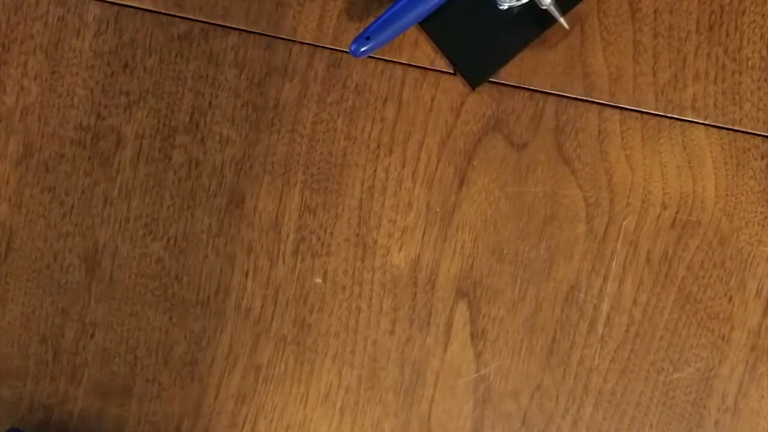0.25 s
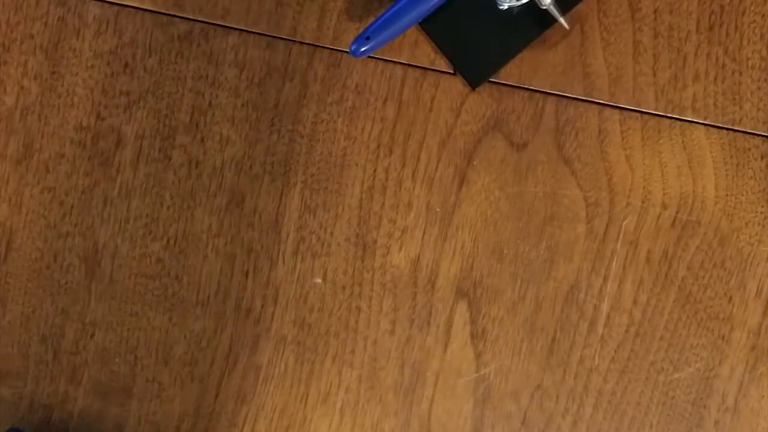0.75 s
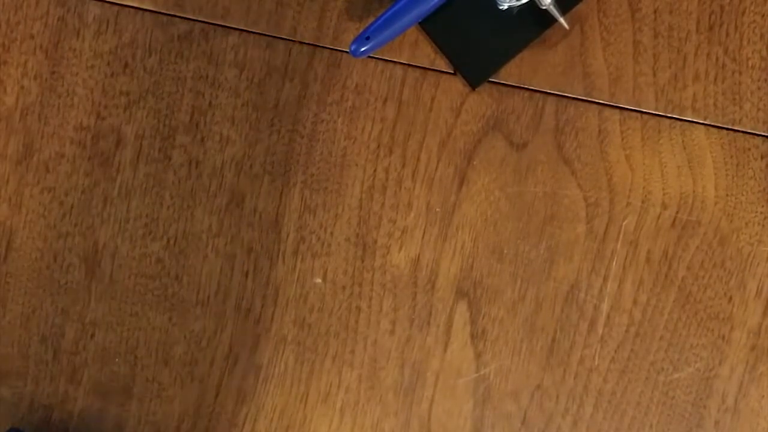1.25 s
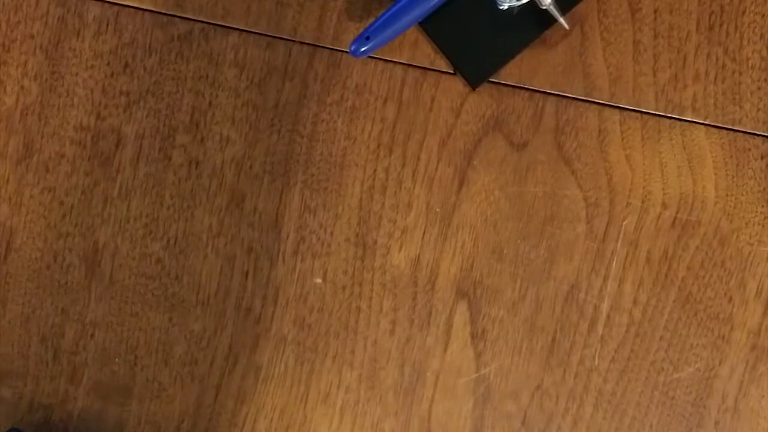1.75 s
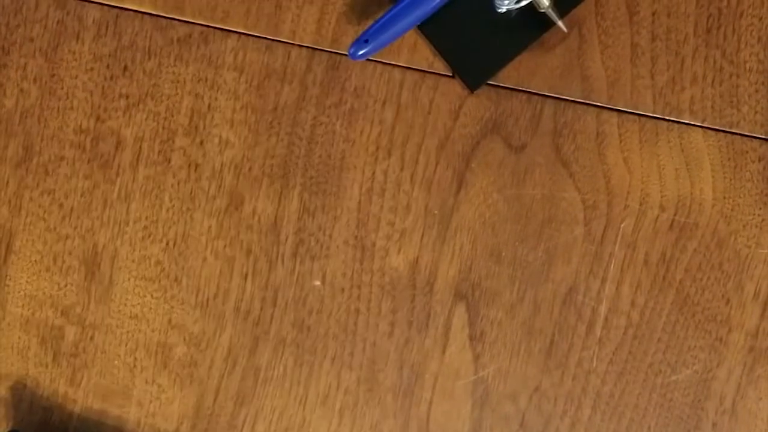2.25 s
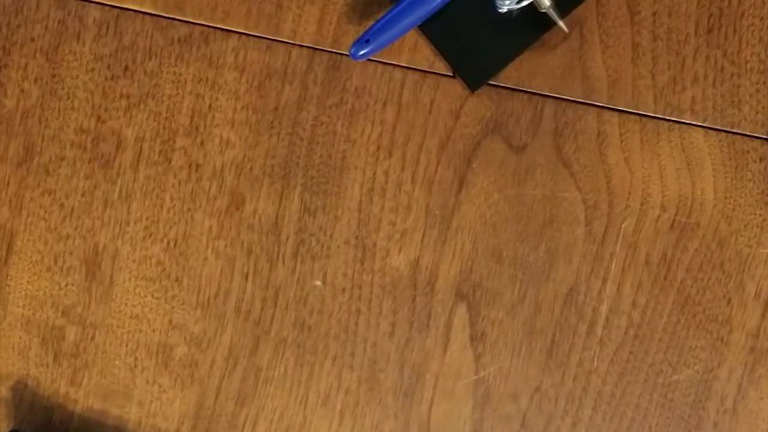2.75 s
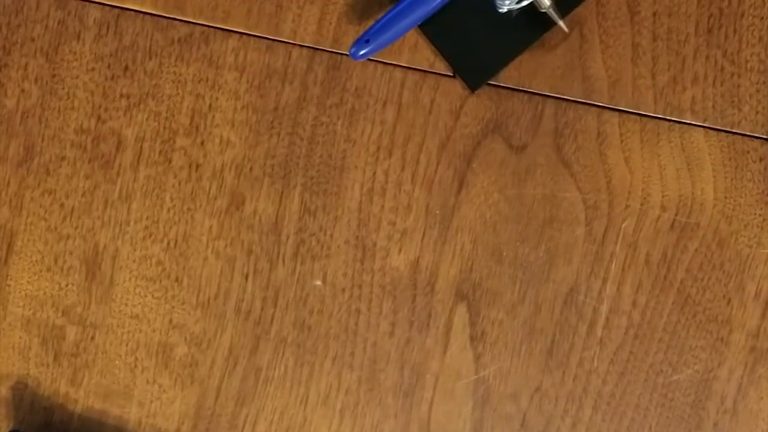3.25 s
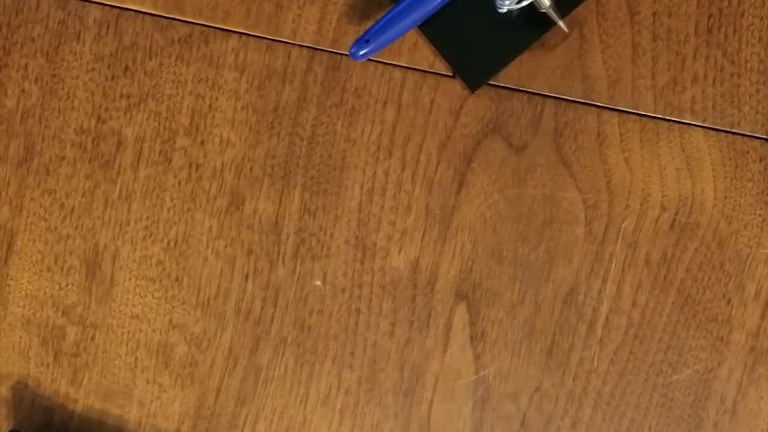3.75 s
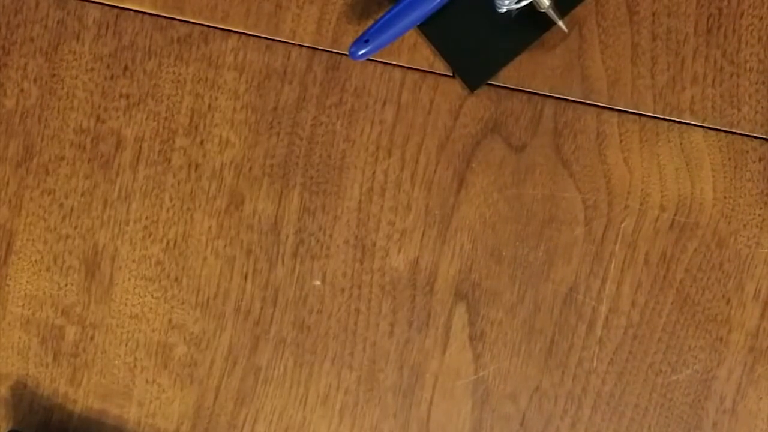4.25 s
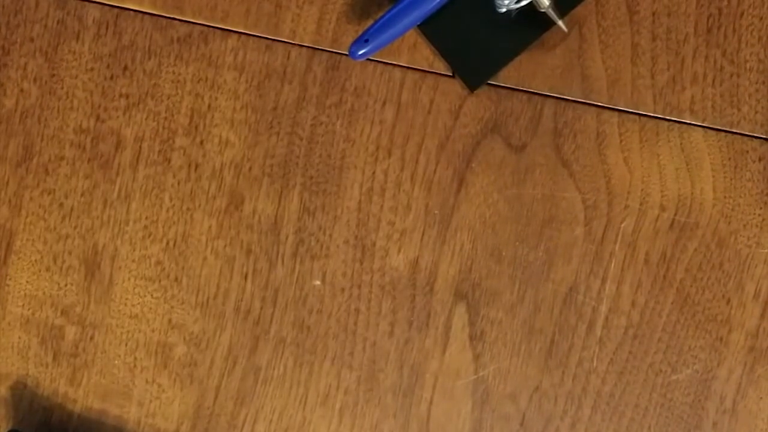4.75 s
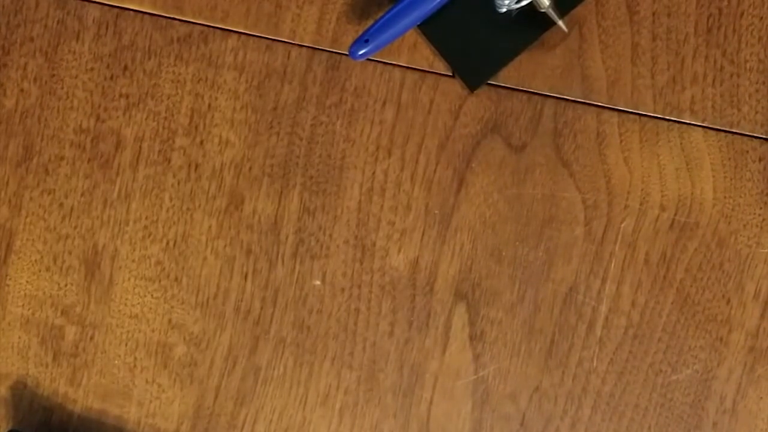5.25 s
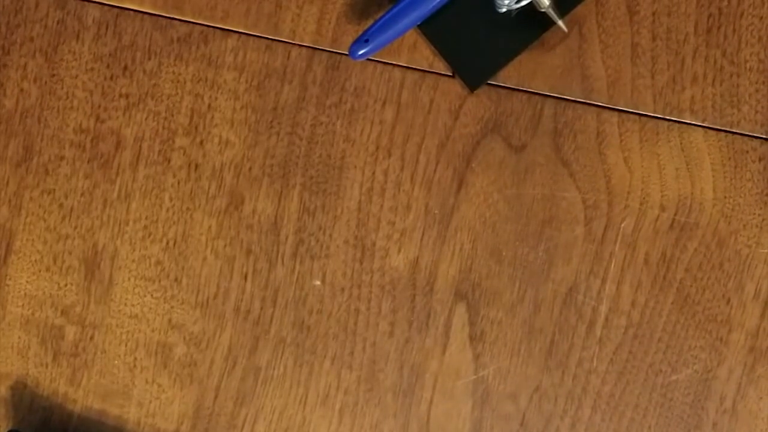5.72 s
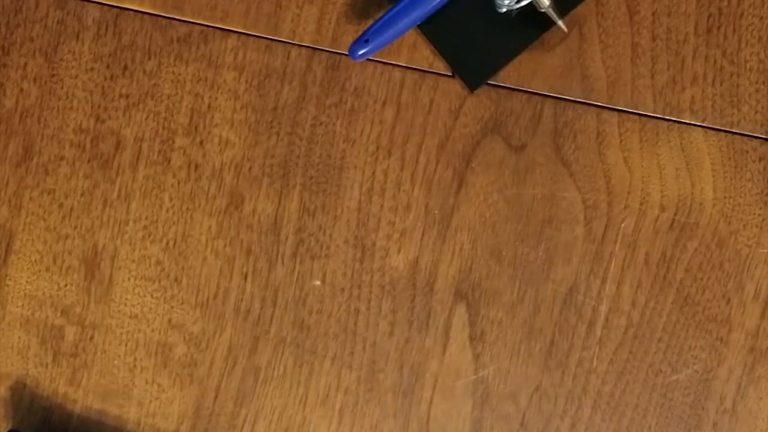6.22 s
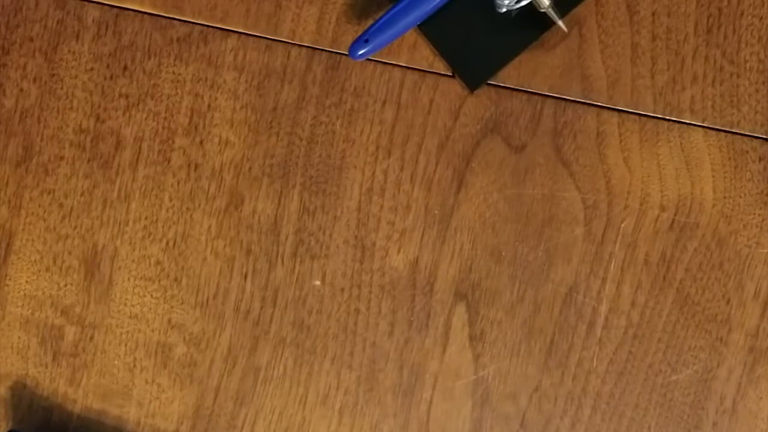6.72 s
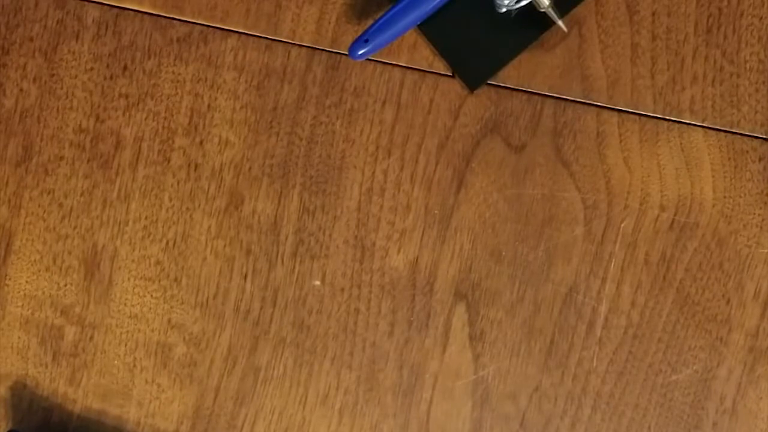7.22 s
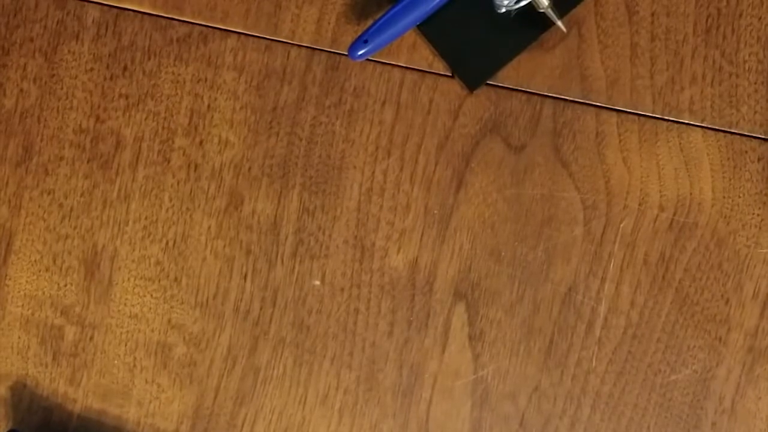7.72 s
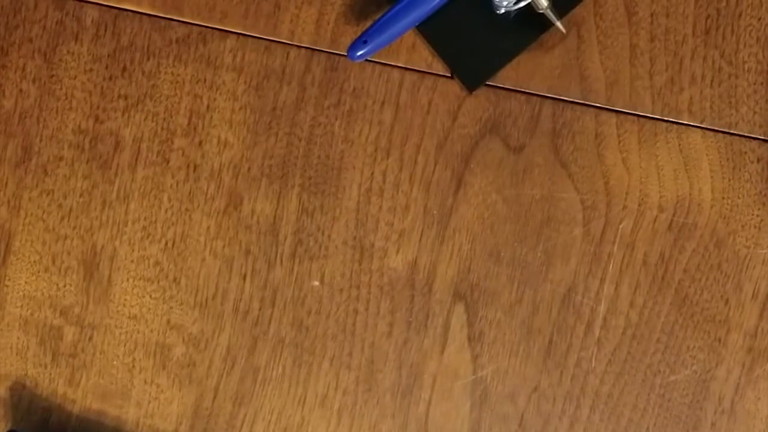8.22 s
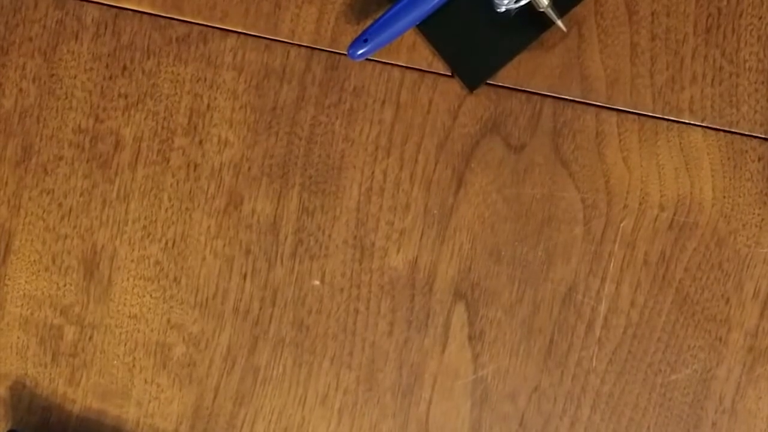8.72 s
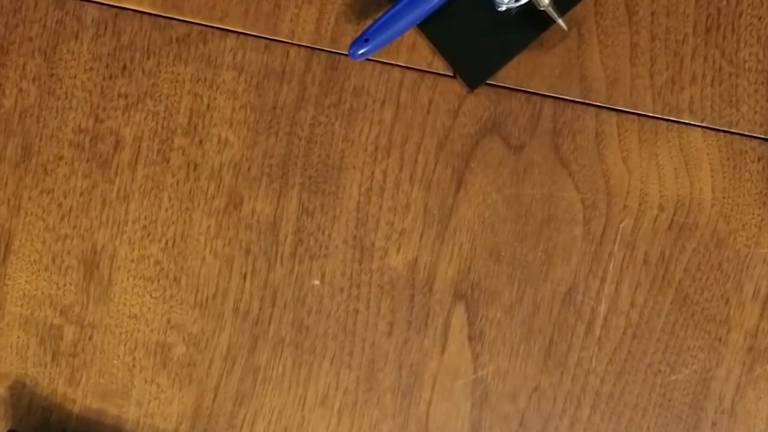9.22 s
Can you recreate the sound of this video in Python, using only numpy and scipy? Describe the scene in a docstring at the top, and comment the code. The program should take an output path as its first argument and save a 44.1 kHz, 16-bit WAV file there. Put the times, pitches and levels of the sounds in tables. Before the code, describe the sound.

Close rhythmic scraping on a hollow-ringing wood table, seven strokes, a pause with light taps, then thirteen more with a few dull bumps.

```python
"""First come dull rubs of a palm and faint brushes over quiet room noise, heard by a phone close by.
Then a hand scrapes something back and forth over a wooden tabletop, about three strokes a second, in two runs.
Catches on the grain are bursts of random force that ring the boards; the edge adds a hiss and digs in.
Between strokes it slides back lightly. Short pushes make bumps and taps; swells of filtered noise make rubs.
Each touch is filtered to two microphone ports, with the echoes of a small room."""
import sys
import numpy as np
from scipy import signal
from scipy.fft import rfft, irfft
from scipy.io import wavfile

SR = 44100
rng = np.random.default_rng(int(sys.argv[2]) if len(sys.argv) > 2 else 0)


def store_pcm(level_fs):
    """Save levels as 16-bit WAV."""
    pcm = np.round(np.clip(level_fs, -1, 1) * 32767).astype(np.int16)
    wavfile.write(sys.argv[1], SR, np.atleast_2d(pcm).T)


N = 417627

# scraping strokes: (middle [s], length [s], relative level [dB],
# how long before the middle the edge digs in [s], relative jolt as the hand brakes [dB])
STROKES = [(1.946, 0.136, -29, .025, -43), (2.257, 0.14, -27.5, 0.039, -36.5),
           (2.566, 0.13, -27.5, 0.018, -32), (2.891, .13, -28, 0.027, -23.5),
           (3.209, 0.15, -26, 0.022, -30.5), (3.522, 0.13, -26.5, 0.019, -21),
           (3.858, 0.12, -30, 0.017, -23), (5.246, 0.2, -35, .056, -42), (5.561, 0.17, -35.5, 0.01, -22),
           (5.866, 0.15, -28.5, .003, -29.5), (6.177, 0.15, -30, 0.052, -29),
           (6.476, 0.14, -25.5, 0.065, -28), (6.785, 0.14, -29.5, 0.035, -28),
           (7.081, 0.15, -28.5, .05, -41), (7.393, 0.17, -29, 0.06, -44), (7.7, 0.17, -30, 0.029, -31.5),
           (8.022, 0.17, -30, 0.021, -30), (8.358, 0.19, -27.5, 0.0063, -23),
           (8.691, .16, -28.5, 0.0085, -40), (9.028, 0.16, -31.5, 0.031, -33)]
# how heavily the edge rests on the wood on the way back: (time [s], relative level [dB])
RETURN_WEIGHT = [(2.1, -55), (2.75, -60), (3.35, -47.5), (3.7, -52), (5.4, -52), (6.0, -46.5), (6.6, -41.5),
                 (7.25, -47), (7.9, -47.5), (8.5, -45), (8.85, -55)]
# stray bumps of the hand on the table: (time [s], relative level [dB])
BUMPS = [(1.902, -41.5), (1.947, -31), (4.632, -28), (7.667, -28.5), (7.973, -23.5), (8.25, -24),
         (8.327, -31), (8.433, -16)]
# light hard taps: (time [s], relative level [dB], contact time [s])
TAPS = [(1.901, -47.5, 0.00055), (4.450, -40, 0.00015), (4.651, -39, 0.00032), (4.985, -37.5, 0.0008),
        (8.24, -33.5, 0.00047)]
# brushes, ticks, squeaks, low thumps and rubs, and the last slide back:
# (start [s], length [s], level [dB], centre [Hz], width of each filter pass [Hz])
SMALL_TOUCHES = [(.4245, 0.0019, -34, 4600, 1970), (.442, 0.0018, -34, 4500, 2600),
                 (.424, 0.062, -44, 1940, 3130), (.435, 0.11, -47, 320, 260),
                 (.69, 0.038, -51.5, 3140, 3330), (.70, 0.061, -49.5, 556, 300),
                 (.96, 0.17, -63, 2130, 3140), (4.63, 0.065, -37.5, 228, 260),
                 (5.188, 0.029, -36.5, 2700, 2270), (6.052, 0.028, -40.5, 1120, 1190),
                 (8.237, 0.031, -37.5, 1100, 1460), (8.407, 0.012, -28.5, 2680, 550),
                 (8.37, 0.21, -29, 210, 190), (9.28, 0.37, -52, 780, 1880)]
# dull rubs of the palm: (start [s], length [s], level [dB])
PALM_RUBS = [(0.0, 0.13, -47.5), (0.153, 0.17, -48), (.27, 0.3, -47), (.85, .33, -45.5), (1.697, 0.19, -46),
             (4.891, 0.34, -54.5), (5.187, 0.1, -34)]
# the table rocks on its legs: (start [s], level [dB])
ROCKS = [(0.698, -43), (.95, -30.5), (1.715, -39.5), (2.622, -39), (7.76, -41), (8.369, -39)]
# resonances of the tabletop: (frequency [Hz], relative level [dB])
TABLE_MODES = [(46, -16), (79, 0.5), (136, 2), (200, -8), (237, -3.5), (288, -2), (328, -1), (392, 0),
               (531, -1), (603, -2), (650, -6), (761, -2.5), (867, -2), (965, -11), (1007, -0.5),
               (1050, -2), (1119, -7.5), (1217, -8.5), (1280, -4.5), (1353, -9.5), (1895, -5.5),
               (1968, -15), (2081, -17.5)]
# what a tap rings with: (frequency [Hz], relative level [dB], width [Hz])
TAP_MODES = [(296, -2.5, 8.5), (632, 4, 47), (650, -10, 53), (1380, -12, 140), (1590, 0, 73),
             (2000, -7, 270), (2740, -7.5, 320), (3500, -10.5, 350)]
# dense wood resonances, as a spectrum: (frequency [Hz], relative level [dB per Hz])
GRAIN = [(40, -0.5), (80, 4), (200, -7), (450, 0), (1100, -0.5), (1550, -4), (2100, -1.5), (3400, -10),
         (5000, -18.5), (8000, -28.5), (16000, -24)]
# hiss of the edge, as a spectrum: (frequency [Hz], relative level [dB per Hz])
EDGE = [(1500, -15), (3500, 13), (5000, 2), (6800, 3.5), (8300, -18.5), (10000, 0), (12000, 1.5),
        (14000, 2), (16000, -8)]
# tone of the light slide back, against a body's own tone: (frequency [Hz], gain [dB])
LIGHT_TOUCH = [(60, 7), (250, -3), (550, 1.5), (1100, 1), (2500, -5), (5000, -6.5), (12000, -7)]
# low shaking of the table in a bump: (frequency [Hz], relative level [dB per Hz])
JUDDER = [(30, -8.5), (80, 0.5), (100, -1), (140, 5), (200, -10), (300, -11.5), (600, -23.5), (2000, -64.5)]
# room noise and microphone hiss: (frequency [Hz], relative level [dB per Hz])
QUIET = [(25, -7.5), (60, 6.5), (130, -7.5), (250, -10), (600, -18), (1000, -23), (2000, -22.5),
         (4000, -32.5), (5200, -26.5), (6500, -40.5), (9000, -44.5), (12500, -26), (16000, -29.5)]
# the room's answer against the direct sound: (frequency [Hz], level [dB])
ROOM = [(60, -15.5), (200, -11.5), (500, -1.5), (1200, -1), (4000, 7), (12000, 1)]
# left level minus right level: (frequency [Hz], difference [dB])
BALANCE = [(60, 4.1), (250, 2.8), (600, 4.4), (760, 1.8), (1100, 5.8), (2200, 5.4), (3500, 5.1),
           (7000, 1.3), (14000, 0.75)]

CUT_IN_S = 1.943  # the scraping cuts in here, with the first stroke already under way
USUAL_STROKE_S = 0.14  # every stroke covers the same distance, so a shorter one is faster
PRESSURE_RISE_DB = 2.5  # the hand leans in over each stroke
SKIM_DB = -1  # until it digs in, the edge only skims the wood
EDGE_DB = -43  # hiss of the edge in a usual stroke, before mixing
BRAKE_SHARE = 0.2193  # the hand brakes this share of a stroke after its middle
# rest before and after the slide back, and gaps this long are pauses without a slide
REST_AFTER_S, REST_BEFORE_S, PAUSE_S = 0.02, 0.0027, 0.6
PUSH_S, JUDDER_S = 0.0042, 0.03  # length of a bump's push, and time scale of the judder's fading
PALM_HZ, ROCK_HZ, ROCK_S = 139, 46.3, 0.17
ROOM_T60_S, ROOM_TREBLE_T60_S = 0.3, 0.23  # time for the echoes to fall by 60 dB
PORT_LAG_S = 0.000259  # lag of the left port in the treble; it shrinks toward the bass
QUIET_DB = -59  # level of the noise shared by both sides
TOP_HZ = 15850

TIME = np.arange(N) / SR
SIZE = 2 ** 14  # length of every filter in samples
FREQ = np.maximum(np.arange(SIZE // 2 + 1) * SR / SIZE, 1)


def scraping(table, modes_db=-4, grain_db=-4, hiss_db=-4, slide_db=-1):
    """Strokes and slides ring the main modes and the dense wood resonances; the edge itself hisses."""
    effort, hiss = stroke_effort() * grip()
    light = return_effort()
    parts = []
    for body in (undb(modes_db) * table, undb(grain_db) * colour(GRAIN)):
        drag_force = friction(catch_rate=1500, spread_db=4.0, smooth_db=-5.0) * effort
        slide_force = friction(catch_rate=600, spread_db=4.5, smooth_db=-6.5) * light
        edge_force = friction(catch_rate=2000, spread_db=0.5, smooth_db=-7) * hiss
        drag = through(drag_force, body)
        slide = through(slide_force, unit(body) * slope(LIGHT_TOUCH))
        edge = through(edge_force, colour(EDGE))
        parts.append(drag + undb(slide_db) * slide + undb(hiss_db) * edge)
    return parts


def stroke_effort(speed_power=1.315, hiss_power=1.84, pace_power=1.0):
    """Drag on the wood follows speed and pressure; hiss follows speed alone and is louder in a quick stroke."""
    wood, hiss = np.zeros(N), np.zeros(N)
    for middle, length, db, lead_s, _ in STROKES:
        span, way, speed = swing(middle, length)
        contact = undb(SKIM_DB * (way * length < -lead_s))
        pressure = undb(db + PRESSURE_RISE_DB * way)
        pace = (USUAL_STROKE_S / length) ** pace_power
        wood[span] += contact * pressure * speed ** speed_power
        hiss[span] += contact * undb(EDGE_DB) * speed ** hiss_power * pace
    return np.array([wood, hiss])


def swing(middle, length):
    """One stroke's samples, its progress from -0.5 to 0.5, and its speed, rising and falling as half a sine."""
    span, age = during(middle - length / 2, length)
    speed = np.abs(np.sin(np.pi * age / length)) * (TIME[span] > CUT_IN_S)
    return span, age / length - .5, speed


def friction(catch_rate, spread_db, smooth_db):
    """Drag force: tiny catches of uneven size on the wood grain (catch_rate per second), over a smooth rub."""
    happens = rng.random(N) < catch_rate / SR
    direction = rng.choice([-1, 1], N)
    size = undb(spread_db * np.minimum(rng.exponential(size=N), 4))
    catches = happens * direction * size
    return unit(unit(catches) + undb(smooth_db) * noise())


def grip(patch_rate=70, uneven_db=2.0):
    """The grain is uneven: the edge grips more or less from patch to patch (patch_rate per second)."""
    patches = rng.standard_normal(N // 100)
    return unit(undb(uneven_db * np.interp(TIME * patch_rate, np.arange(len(patches)), patches)))


def biting(table, bite_db=1.5, bite_s=0.042, speed_power=0.98, pace_power=1.8, centre_hz=950, width_hz=650):
    """The edge digs in and chatters, driving the boards' middle range; the faster it moves, the harder."""
    force = np.zeros(N)
    for middle, length, db, lead_s, _ in STROKES:
        span, way, speed = swing(middle, length)
        age = way * length + lead_s
        fading = (age > 0) * np.exp(-(age / bite_s) ** 2)
        pace = (USUAL_STROKE_S / length) ** pace_power
        force[span] += undb(db) * fading * speed ** speed_power * pace
    # the dense resonances answer at once, the main modes build up a little later
    bodies = (unit(body * resonance(centre_hz, width_hz)) for body in (table, colour(GRAIN)))
    return undb(bite_db) * sum(through(force * noise(), body) for body in bodies) / np.sqrt(2)


def return_effort(swell_power=0.23):
    """A light, uneven slide back fills the gap between one stroke and the next."""
    light = np.zeros(N)
    for (middle, length, *_), (next_middle, next_length, *_) in zip(STROKES, STROKES[1:]):
        start = middle + length / 2 + REST_AFTER_S
        gap = next_middle - next_length / 2 - REST_BEFORE_S - start
        if gap < PAUSE_S:
            span, age = during(start, gap)
            light[span] = np.abs(np.sin(np.pi * age / gap)) ** swell_power
    weight = undb(np.interp(TIME, *np.transpose(RETURN_WEIGHT)))
    return light * grip(patch_rate=22, uneven_db=3.0) * weight


def bumps(table, push_db=30, judder_db=-4):
    """Braking strokes and stray bumps: a soft push swings the low modes, and the hand judders on briefly."""
    brakes = [(middle + BRAKE_SHARE * length, db) for middle, length, _, _, db in STROKES]
    jolts = brakes + list(BUMPS)
    shake = np.zeros(N)
    for start, db in jolts:
        span, age = during(start, 8 * JUDDER_S)
        shake[span] += undb(db) * 2 * np.sqrt(age / JUDDER_S) * np.exp(-age / JUDDER_S)
    force = pushes([(start, db, PUSH_S) for start, db in jolts])
    thud = through(force, unit(table * slope(JUDDER)))
    judder = through(shake * noise(), colour(JUDDER))
    return undb(push_db) * thud + undb(judder_db) * judder


def handling(width_share=0.81):
    """The palm shuffles and the table rocks: broad, dull rubs."""
    palm = [(start, length, db, PALM_HZ, width_share * PALM_HZ) for start, length, db in PALM_RUBS]
    rocks = [(start, ROCK_S, db, ROCK_HZ, width_share * ROCK_HZ) for start, db in ROCKS]
    return rubs(palm + rocks)


def taps(tap_db=29, crack_db=-10, crack_s=0.019):
    """Hard little contacts with a brief crack; a longer contact sounds duller."""
    burst = rng.standard_normal(SIZE) * np.exp(-TIME[:SIZE] / crack_s)
    crack = unit(rfft(burst) * colour(GRAIN))
    return undb(tap_db) * through(pushes(TAPS), ringing(TAP_MODES) + undb(crack_db) * crack)


def rubs(rows):
    """Short swells of friction noise in one band each; a narrow band squeaks."""
    out = np.zeros(N + 2 * SIZE)
    for start, length, db, hz, width in rows:
        span, age = during(start, length)
        force = np.sin(np.pi * age / length) * rng.standard_normal(SR)[:len(age)]
        band = unit(resonance(hz, width) ** 2)  # squared: filtered twice
        sound = signal.fftconvolve(force, irfft(band))
        out[span.start:span.start + len(sound)] += undb(db) * sound
    return out[:N]


def pushes(rows):
    """Half-sine contact forces from (time [s], level [dB], length [s]) rows; the level sets their area."""
    force = np.zeros(N)
    for start, db, length, *_ in rows:
        span, age = during(start, max(length, 4 / SR))
        shape = np.sin(np.pi * (np.arange(len(age)) + .5) / len(age))
        force[span] += undb(db) * shape / shape.sum()
    return force


def at_phone(sound, bend_hz=400):
    """Sound from the table at two ports, each with its own echoes; the left is louder and a little later."""
    lag = np.exp(-2j * np.pi * FREQ * PORT_LAG_S * FREQ / (FREQ + bend_hz))
    lean = np.sqrt(slope(BALANCE))
    norm = np.sqrt(1 + slope(ROOM) ** 2)  # keeps the level steady with the echoes added
    left = through(sound, (lag + room()) * lean / norm)
    right = through(sound, (1 + room()) / lean / norm)
    return np.array([left, right])


def room(split_hz=3000, first_echo_s=0.0012):
    """Diffuse echoes at one microphone port, made of fading noise; the treble dies sooner."""
    age = TIME[:SIZE]
    echoes = rng.standard_normal(SIZE) * (age > first_echo_s)
    low = unit(rfft(echoes * undb(-60 * age / ROOM_T60_S)))
    high = unit(rfft(echoes * undb(-60 * age / ROOM_TREBLE_T60_S)))
    low_share = 1 / (1 + (FREQ / split_hz) ** 2)
    return (low_share * low + (1 - low_share) * high) * slope(ROOM)


def background(side_db=-2, alike_hz=300):
    """Steady room noise and microphone hiss, alike on both sides only in the bass."""
    mid = through(noise(), colour(QUIET))
    side = through(noise(), colour(QUIET) * FREQ / (FREQ + alike_hz)) * undb(side_db)
    return undb(QUIET_DB) * np.array([mid + side, mid - side])


def ringing(modes):
    """Response of a body with many resonances; neighbouring modes swing in opposite senses."""
    return unit(sum((-1) ** k * undb(db) * resonance(hz, width) for k, (hz, db, width) in enumerate(modes)))


def resonance(hz, width):
    """One damped resonance, gain one at its centre."""
    return 1 / (1 + 1j * (FREQ ** 2 - hz ** 2) / (FREQ * width))


def colour(points):
    """Filter with the tone of a spectrum table, at unit power; it never sounds before its input."""
    cepstrum = irfft(np.log(slope(points)), SIZE)
    # doubling the first half of the cepstrum makes the response causal
    return unit(np.exp(rfft(2 * cepstrum[:SIZE // 2], SIZE)))


def slope(points):
    """Gain over frequency from (frequency [Hz], level [dB]) points."""
    hz, db = np.transpose(points)
    return undb(np.interp(np.log(FREQ), np.log(hz), db))


def through(x, response):
    """Pass a sound through a frequency response."""
    lead = SIZE // 16  # room for any part of the response that comes before time zero
    return signal.oaconvolve(x, np.roll(irfft(response, SIZE), lead))[lead:lead + N]


def during(start, length):
    """The samples that an event covers, and their age in seconds."""
    span = slice(*np.searchsorted(TIME, [start, start + length]))
    return span, TIME[span] - start


def noise():
    """White noise."""
    return rng.standard_normal(N)


def unit(x):
    """Scale to an average power of one."""
    return x / np.sqrt(np.mean(np.abs(x) ** 2) + 1e-30)


def undb(db):
    """Decibels to gain."""
    return 10 ** (np.asarray(db) / 20)


def scene(lowest_width_hz=18, wood_loss=0.0064):
    """The tabletop, damped more as its modes rise, all that touches it, and the background."""
    table = ringing([(hz, db, lowest_width_hz + wood_loss * hz) for hz, db in TABLE_MODES])
    main_modes, dense_wood = scraping(table)
    hand = bumps(table) + handling() + taps() + rubs(SMALL_TOUCHES)
    # each group reaches the phone with echoes of its own
    return at_phone(main_modes) + at_phone(dense_wood) + at_phone(biting(table) + hand) + background()


def record(dry):
    """The phone cuts the top with a steep low-pass filter."""
    return signal.sosfilt(signal.ellip(10, .2, 80, TOP_HZ, fs=SR, output="sos"), dry)


dry = scene()
out = record(dry)
store_pcm(out)
```